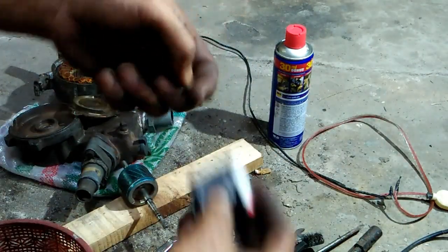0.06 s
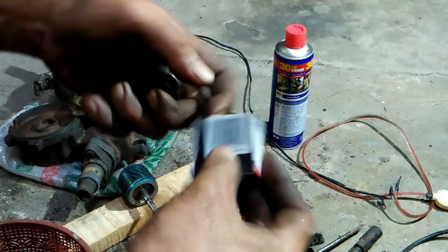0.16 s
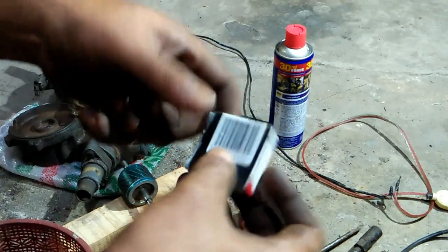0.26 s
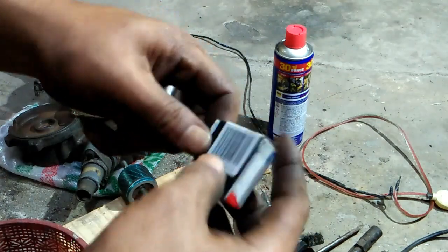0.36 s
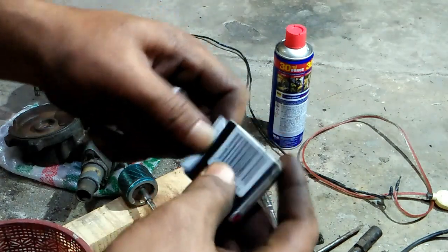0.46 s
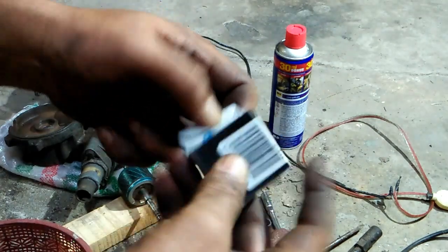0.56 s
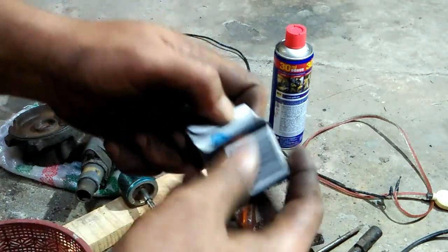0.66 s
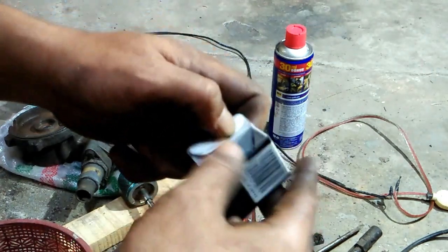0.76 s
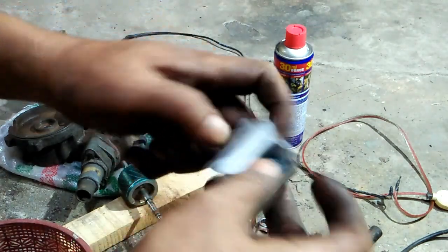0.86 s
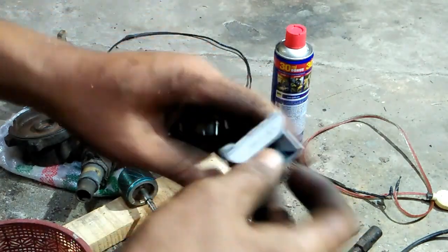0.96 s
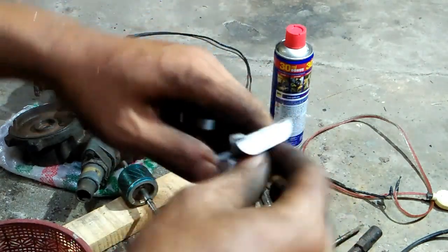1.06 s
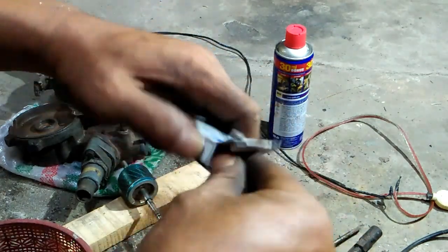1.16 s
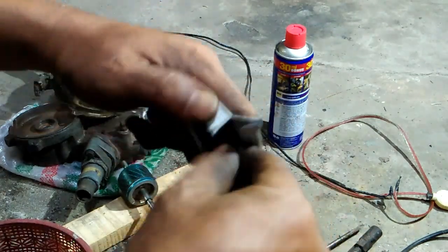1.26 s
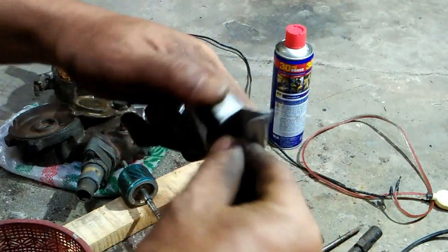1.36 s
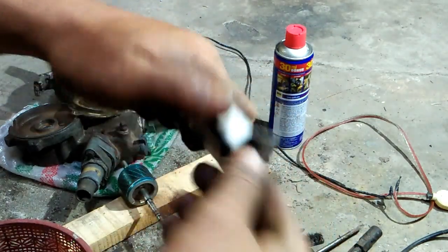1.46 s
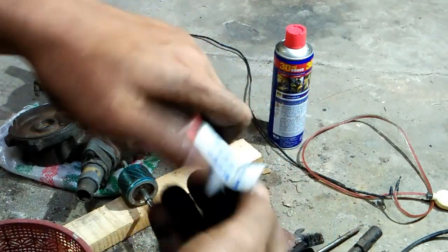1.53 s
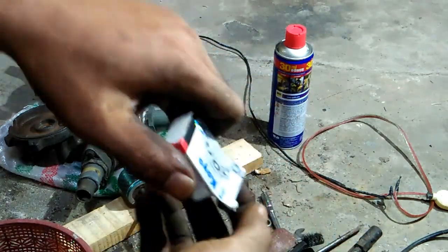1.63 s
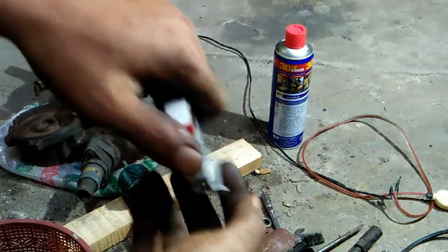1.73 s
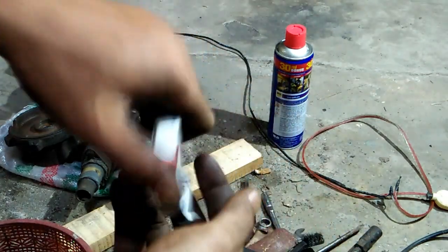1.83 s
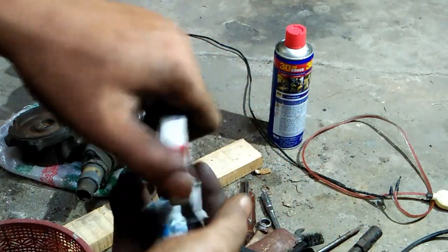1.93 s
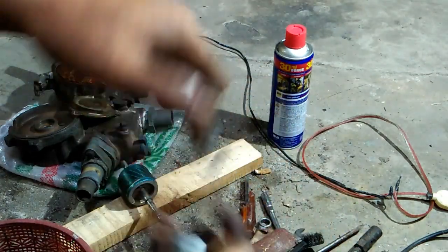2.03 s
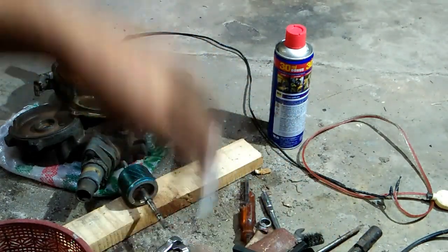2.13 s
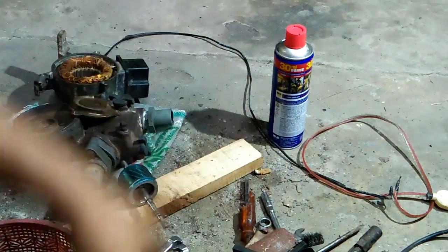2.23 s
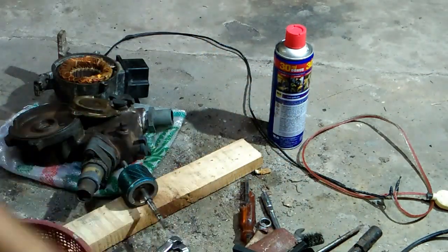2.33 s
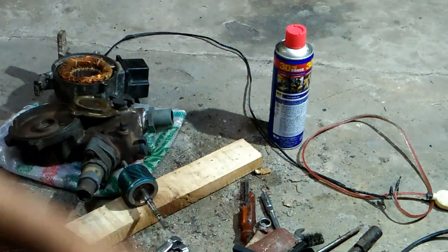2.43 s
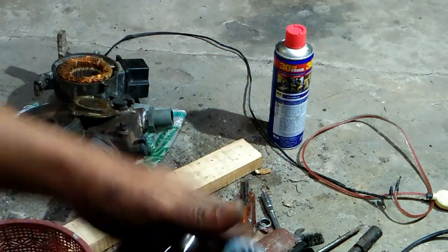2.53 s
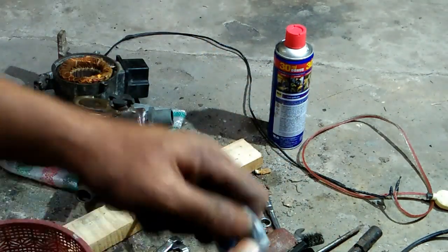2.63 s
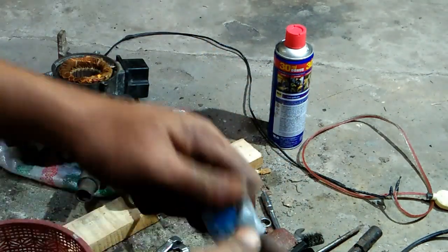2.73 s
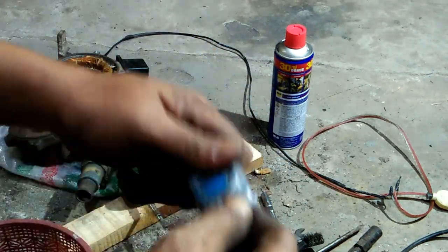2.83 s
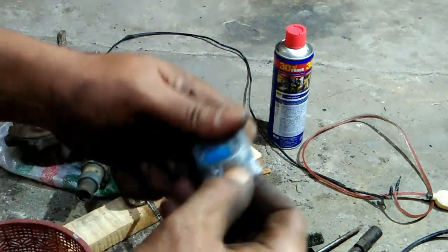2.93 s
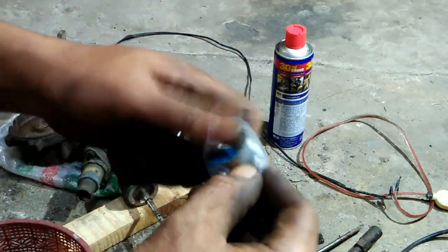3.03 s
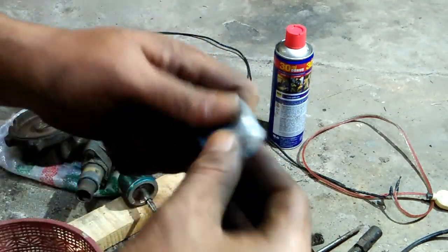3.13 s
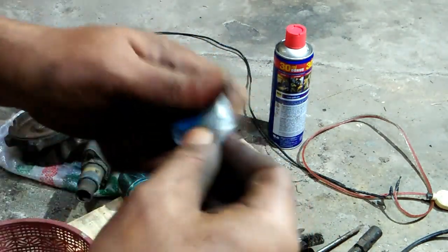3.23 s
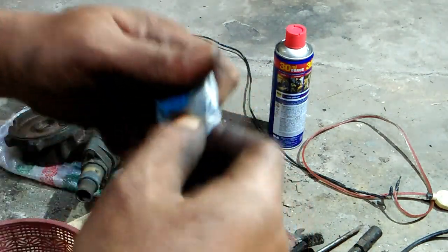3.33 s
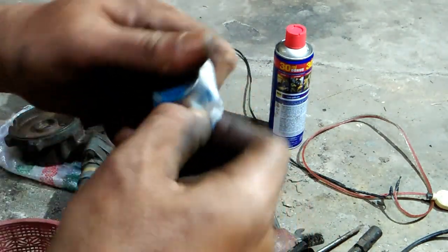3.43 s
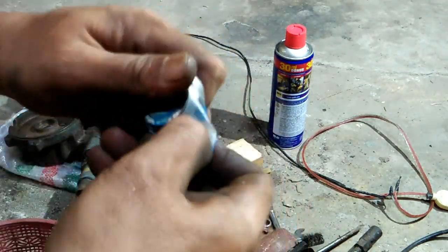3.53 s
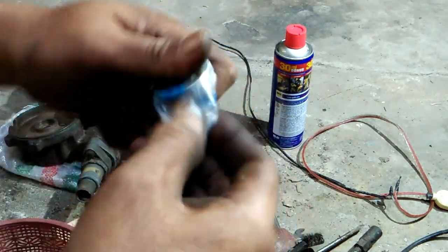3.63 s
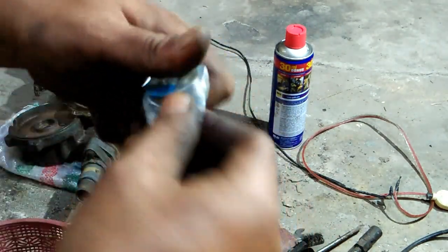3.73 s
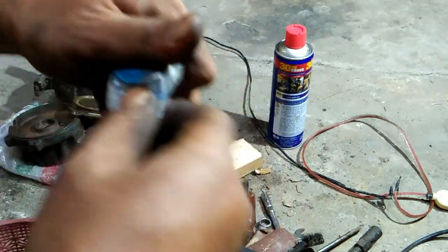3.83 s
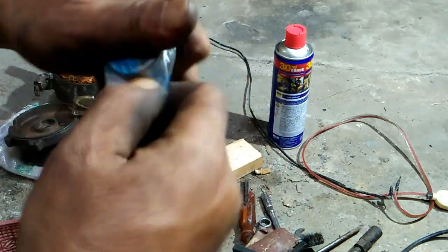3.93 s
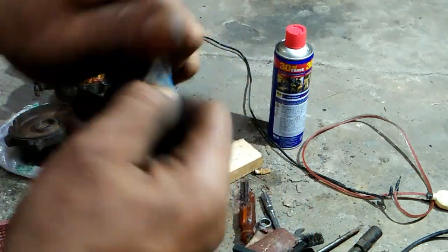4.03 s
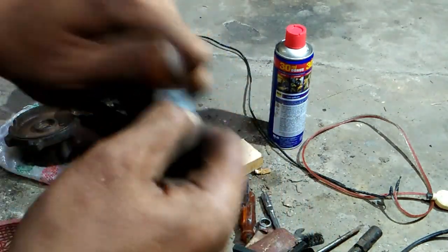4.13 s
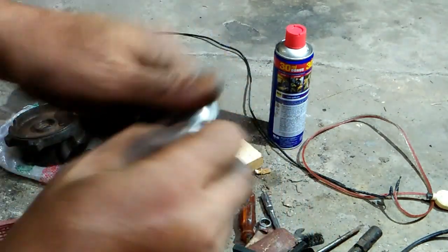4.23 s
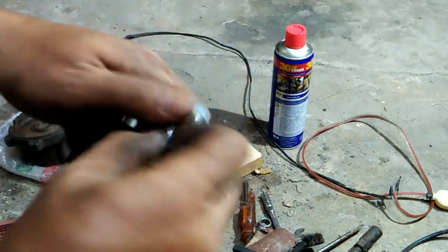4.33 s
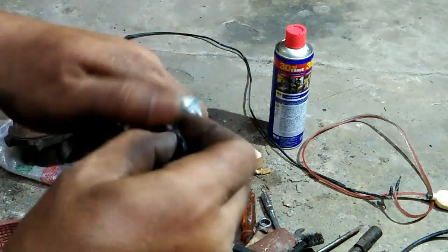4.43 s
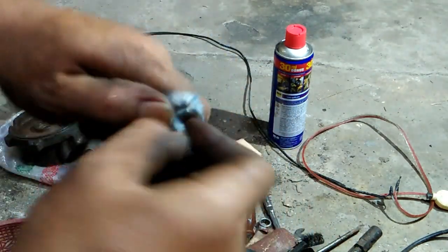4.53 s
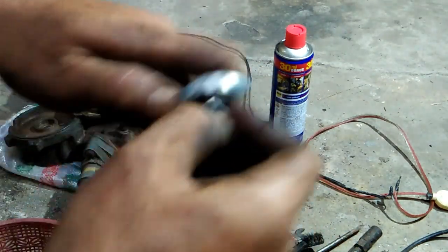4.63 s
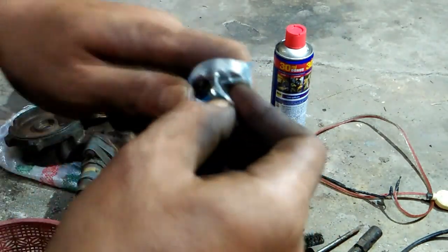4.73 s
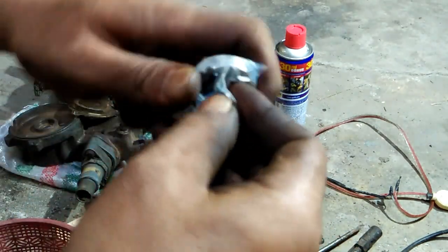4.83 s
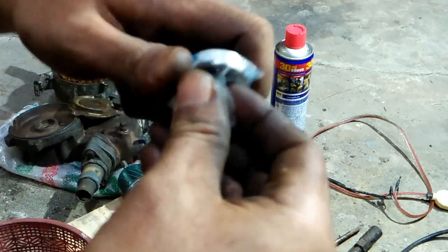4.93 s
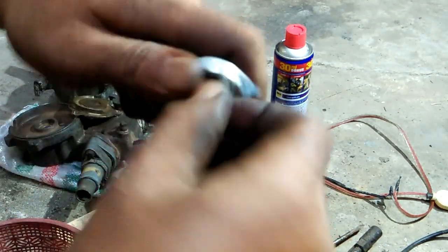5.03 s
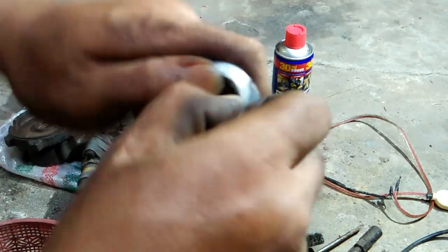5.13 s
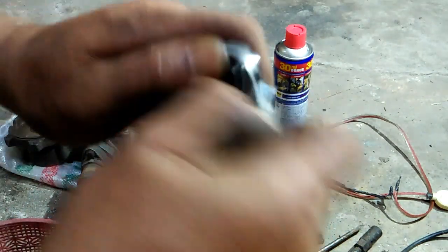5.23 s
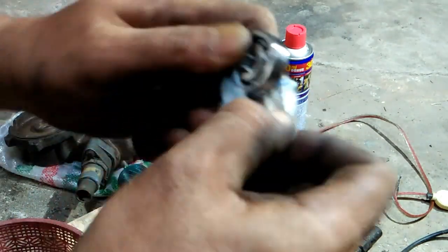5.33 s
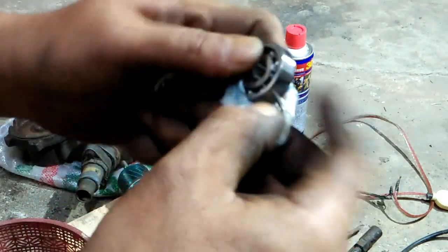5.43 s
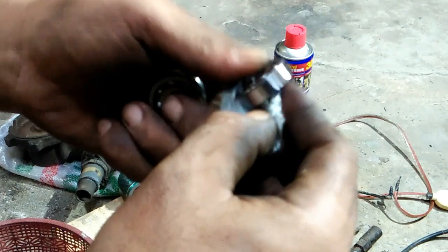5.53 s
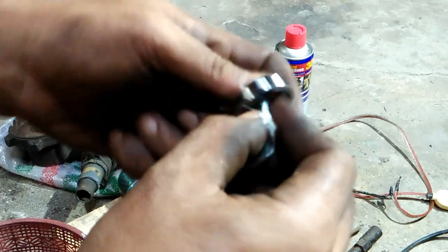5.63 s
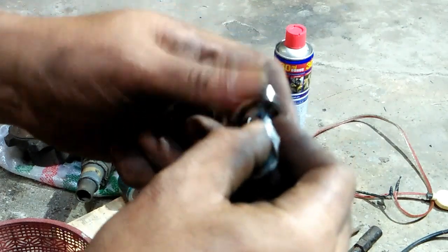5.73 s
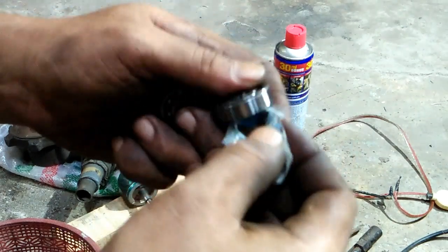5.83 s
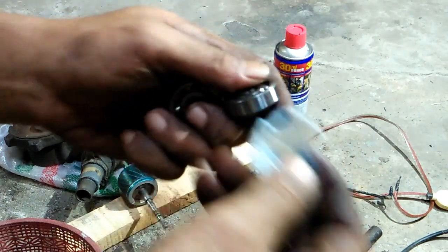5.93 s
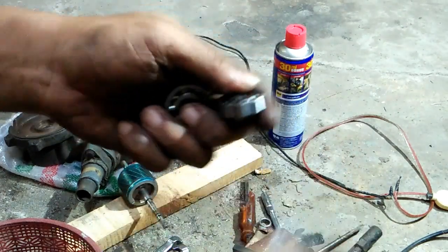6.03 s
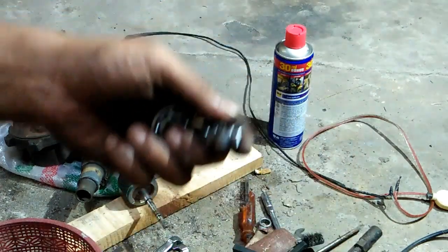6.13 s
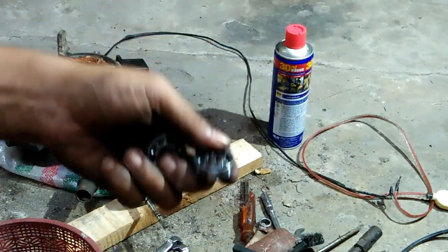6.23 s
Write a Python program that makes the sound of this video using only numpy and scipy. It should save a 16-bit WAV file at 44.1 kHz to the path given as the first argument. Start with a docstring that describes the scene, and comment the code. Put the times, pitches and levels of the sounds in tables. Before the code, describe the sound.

Dry, close handling sounds: soft hollow card taps and brief scrapes at first, a bright click or two, then a firm dull knock near the middle. From there thin stiff plastic crinkles almost continuously, with crisp high snaps and small avalanches of crackle over faint rubbing. Low soft hand bumps, still air and a faint hard-walled room sit behind.

```python
"""In a concrete work area, close by, two hands open a small carton, toss it aside and peel the thin
plastic sleeve off a ball bearing. Creases buckle in sharp snaps, each a filtered pulse with a ring, and in
avalanches of tiny random pulses; card and cupped fingers add a hollow resonance. Narrow noise gives the
sliding, short low pulses the knocks, shaped noise the air and soft bumps.
Convolution with a decaying noise tail adds the faint room and a late wall echo."""
import sys
import numpy as np
from scipy import signal
from scipy.fft import rfft, irfft
from scipy.io import wavfile
from scipy.ndimage import uniform_filter1d

SR = 44100
rng = np.random.default_rng(int(sys.argv[2]) if len(sys.argv) > 2 else 0)


def wav_out(sig):
    """Save sig, one row per channel (or a flat mono array), as 16-bit PCM at SR to the path in sys.argv[1]."""
    wavfile.write(sys.argv[1], SR, np.round(np.clip(np.atleast_2d(sig).T, -1, 1) * 32767).astype(np.int16))


N = 276507

# Still air. Each row: frequency in Hz, relative level in dB per Hz.
AIR_SPECTRUM = [(20, -6), (45, -6.5), (80, 5), (120, -6.5), (170, -4), (250, -13), (500, -10.5),
                (1100, -8.5), (1800, -19), (3000, -22.5), (6000, -28.5), (9400, -20), (14000, -19)]
AIR_DB = -70
# Low bumps of the hands. Each row: frequency in Hz, relative level in dB per Hz.
BUMP_SPECTRUM = [(15, -15), (45, 7), (80, -5), (115, -3), (170, -12.5), (260, -26.5), (500, -31)]
# Soft bumps of the hands. Each row: time of the peak in seconds, level in dB.
BUMPS = [(0.174, -57.5), (0.82, -66), (1.165, -60), (1.98, -65), (4.695, -66), (5.04, -71), (5.21, -60),
         (5.27, -58), (5.315, -57), (5.395, -61.5), (5.71, -61)]
# Reverberation time of the room. Each row: frequency in Hz, time to fall by 60 dB in seconds.
ROOM_T60 = [(300, 0.98), (1500, 0.4), (4000, 0.15), (9000, 0.45), (14000, 0.62)]
# Swishes and squeaks of sliding. Each row: start in seconds, length in seconds, first frequency in Hz,
# last frequency in Hz, width of each of two resonances in Hz, level in dB.
SLIDES = [(0, 0.4, 3060, 2170, 1000, -69.5), (1.154, 0.17, 523, 613, 348, -71),
          (1.677, 0.087, 1730, 1600, 446, -59), (1.935, 0.085, 1730, 1720, 395, -49),
          (2.249, 0.072, 800, 875, 365, -57.5), (2.961, 0.051, 3850, 4000, 800, -61),
          (3.012, 0.01, 3670, 3730, 1080, -40), (3.458, 0.112, 825, 760, 407, -61.5),
          (2.425, 0.13, 887, 820, 250, -65.5), (4.407, 0.046, 850, 875, 200, -63.5),
          (5.501, 0.034, 3350, 4070, 500, -50)]
# Dull knocks of carton and fingers. Each row: start in seconds, level in dB over 10 ms.
KNOCKS = [(0.6207, -48), (1.032, -54), (1.183, -59), (1.256, -58.5), (2.07, -61), (2.595, -31.5),
          (3.177, -51.5), (3.523, -56), (5.216, -49), (6.0613, -51.5)]
# Spectrum of a knock. Each row: frequency in Hz, relative level in dB per Hz.
THUD_SPECTRUM = [(50, -44), (130, -31.5), (220, -30.5), (320, -12), (450, -14.5), (560, -6.5), (700, 0),
                 (950, 1.5), (1400, -11), (4000, -44)]
# Three bands heard with each buckle: bright crack of the film, a midrange ring from about 2.4 to 6 kHz, hollow
# note of card and fingers. Each row of the three: frequency in Hz, relative level in dB per Hz.
FILM_SPECTRUM = [(100, -78), (1000, -77), (3500, -38.5), (6000, -15), (7500, -6.5), (8600, -1), (9400, 1),
                 (10300, -2), (11200, -6.5), (12600, -11.5), (14300, -20)]
MIDRANGE_SPECTRUM = [(100, -49), (700, -59), (1400, -26.5), (2400, -1.5), (2800, 0), (3350, 0.5), (3900, 1),
                     (4700, 2.5), (5500, 1), (6300, 1.5), (9000, -18.5)]
HOLLOW_SPECTRUM = [(60, -66.5), (200, -36), (450, -29), (750, -10), (1080, -2.5), (1230, 0), (1380, -0.5),
                   (1600, -1.5), (1870, 0.5), (2150, -0.5), (2500, -8.5), (4500, -24.5)]
# The hollow is retuned by the grip. Each row: time in seconds, resonance in Hz.
GRIP = [(0.0, 1210), (0.45, 1280), (0.8, 1750), (1.25, 1400), (1.7, 1870), (2.1, 1620), (2.28, 940),
        (2.42, 1740), (2.62, 1240), (2.75, 1750), (3.2, 1440), (4.15, 1610), (4.45, 1090), (5.12, 1890),
        (5.25, 1070), (5.38, 1860), (5.75, 1880), (6.05, 1020)]
# The fingers never rest. Each row: time in seconds, level in dB of the faint rustle of the film, level in dB
# of rubbing in the hollow, both before the shares below.
HANDLING = [(0.0, -57.5, -56), (0.57, -76.5, -66.5), (1.41, -57.5, -63), (1.9, -78, -90), (2.08, -83, -101),
            (2.41, -50, -49), (2.69, -66, -68), (3.02, -67, -65), (3.32, -65, -51), (3.65, -57, -64),
            (4.03, -48, -66), (4.19, -55.5, -74), (4.57, -52, -51.5), (4.8, -63.5, -108), (5.1, -53, -63),
            (5.31, -56, -69), (5.54, -62, -73), (6.27, -67, -69.5)]
# dB added for each part; film and midrange follow the rustle, the hollow follows the rubbing
FILM_SHARE_DB, MIDRANGE_SHARE_DB, HOLLOW_SHARE_DB = -6, -18.5, -10.5
# Squeezes and pulls that release many tiny buckles. Each row: time of the peak in seconds, rise in seconds,
# fall in seconds, film level in dB, midrange level in dB re film, hollow level in dB re film.
RUSTLES = [(0.02, 0.055, 0.032, -60.5, -7, 7), (0.611, 0.0052, 0.018, -44.5, -7, 1.5),
           (1.012, 0.0037, 0.03, -56, -10, -16), (1.185, 0.005, 0.062, -52.5, -7, 2),
           (1.4, 0.013, 0.023, -48.5, -24, -9), (1.545, 0.011, 0.005, -46.5, -11, -7.5),
           (1.595, 0.014, 0.029, -54, -5, 2), (1.693, 0.0085, 0.031, -57, -10, 4),
           (1.898, 0.0068, 0.02, -49.5, -9, -3), (1.982, 0.023, 0.027, -40.5, -2.5, 2),
           (2.055, 0.003, 0.021, -30, -5, -5.5), (2.258, 0.003, 0.39, -51, -5.5, -11),
           (2.59, 0.0013, 0.034, -51, 9, 17.5), (2.777, 0.02, 0.048, -40, -8, -2.5),
           (2.893, 0.01, 0.007, -28, -5.5, -14.5), (3.075, 0.0015, 0.017, -34, -12, -24.5),
           (3.115, 0.004, 0.043, -52, -6, -3.5), (3.19, 0.011, 0.078, -50, -3.5, 5),
           (3.295, 0.016, 0.11, -44, -6, -9.5), (3.409, 0.017, 0.0092, -33, -14, -26),
           (3.541, 0.024, 0.012, -60, -3, 10), (3.587, 0.022, 0.006, -43.5, -21, -26),
           (3.766, 0.025, 0.007, -49, -18, -21), (3.84, 0.0094, 0.021, -35.5, -5.5, -11),
           (3.933, 0.0062, 0.0099, -34.5, -12, -13.5), (4.192, 0.0053, 0.01, -55, -3.5, -8),
           (4.323, 0.0048, 0.025, -40, -9.5, -9), (4.502, 0.029, 0.027, -38, -11, -16),
           (4.611, 0.0039, 0.012, -45.5, -2, -31), (4.67, 0.008, 0.051, -40, -13, -21),
           (4.754, 0.071, 0.058, -49.5, -11, -20), (5.165, 0.005, 0.079, -49, -4.5, -4),
           (5.331, 0.0072, 0.015, -41, 0.5, -12), (5.388, 0.0053, 0.021, -27, -7, -7.5),
           (5.522, 0.012, 0.022, -40, -12.5, -14), (5.653, 0.014, 0.012, -42, -4, -6.5),
           (5.735, 0.031, 0.025, -45, -12, -10), (5.821, 0.012, 0.012, -35, -15, -17),
           (5.942, 0.014, 0.02, -37, -8.5, -10), (6.064, 0.017, 0.013, -48.5, -19, -11),
           (6.141, 0.011, 0.022, -50, -19, -22)]
# Single buckles, loud and faint. Each row: start in seconds, level in dB of the bright crack over 3 ms,
# midrange ring in dB re crack, hollow note in dB re crack, centre of the crack in Hz.
SNAPS = [(0.6208, -24.5, -5.5, -9.5, 7500), (0.8173, -53, 5, 9, 8100), (0.9867, -38.5, -9.5, -7.5, 10100),
         (1.2852, -46.5, -8, -1, 9900), (1.3674, -45.5, -19, -11, 9000), (1.5481, -26, -13, -8, 10000),
         (2.004, -31, -7, -16, 9500), (2.06, -28, -12, -13, 9800), (2.117, -33, -6.5, -16, 9300),
         (2.254, -37.5, -15, -28, 9400), (2.2905, -35.5, -3, -8, 9200), (2.3321, -35, -13, -21, 10300),
         (2.3979, -28, -9.5, -19.5, 9400), (2.4868, -35.5, -2, -7, 8900), (2.5849, -23.5, -23, -5, 9400),
         (2.5921, -21, -13, -8, 9800), (2.5949, -21.5, 0, 3, 8000), (2.7501, -31, -6, -9, 8700),
         (2.7563, -35, -7, -10, 9100), (2.7721, -28, -9, -7.5, 8850), (2.809, -32.5, -4, -10, 8860),
         (2.8569, -29, -10.5, -22, 9500), (2.869, -45, -19, -22, 8300), (2.8828, -28.5, -13, -10.5, 9200),
         (2.91, -38, -3, -12, 9500), (2.944, -46.5, -4.5, -14, 9300), (3.016, -28.5, -7, -26.5, 8600),
         (3.0725, -35, -4.5, -31, 9250), (3.1267, -36, -21, -25, 11200), (3.187, -33, -1.5, -10, 8700),
         (3.192, -27, -11.5, -36, 8600), (3.239, -41, -5, -3, 8100), (3.2893, -19, -8.5, -21.5, 9200),
         (3.3699, -32, -9.5, -10.5, 10200), (3.3862, -32, -22, -34, 8900), (3.4005, -36.5, -1, -8, 8600),
         (3.432, -27.5, -17.5, -29, 7860), (3.451, -33, -17, -30, 9450), (3.555, -45, -12, -20, 9700),
         (3.617, -45.5, -4.5, -7, 9600), (3.7727, -29, -14, -15.5, 11160), (3.818, -27, -21, -23, 9650),
         (3.835, -30, -1.5, -9, 8850), (3.8723, -38, -8.5, -16, 9400), (3.9392, -28, -4.5, -18.5, 9400),
         (3.9978, -30, -13, -26, 8200), (4.0597, -36, -10.5, -6.5, 9100), (4.0974, -39.5, -2.5, -11, 9200),
         (4.1123, -22, -11.5, -17.5, 9100), (4.1999, -31, -13.5, -26, 9700),
         (4.2065, -35.5, -28, -37, 9150), (4.483, -30.5, -20, -32, 9200), (4.5335, -33, -2.5, -11.5, 9200),
         (4.6305, -35.5, -30, -43, 9850), (4.6813, -22, -12.5, -23.5, 8050), (4.7183, -40, -11, -18, 9900),
         (4.7924, -27, -12.5, -27.5, 10500), (4.8858, -37.5, -49, -22.5, 11000),
         (4.9489, -33, -25.5, -27, 10100), (5.0394, -36.5, -20.5, -25, 9600),
         (5.0999, -32.5, -12, -16, 8300), (5.1279, -31, -12, -20, 9200), (5.1565, -31.5, -4, -9.5, 9900),
         (5.1601, -31.5, -6.5, -22, 9000), (5.2217, -38.5, -17, -23, 8350), (5.2316, -41, -4, -14, 7800),
         (5.2666, -38, -12, -23, 9700), (5.274, -36, -6, -4, 9900), (5.2866, -24.5, -14, -11.5, 8900),
         (5.3222, -37.5, -12, -5, 8800), (5.3733, -29.5, -2, -19, 9500), (5.377, -22.5, -9, -20, 8800),
         (5.382, -20, -2, -9, 8700), (5.402, -28, -12, -14, 9500), (5.4756, -36.5, -5.5, -11, 10100),
         (5.5082, -43, 2, -2, 8500), (5.6518, -28, -13.5, -19, 8900), (5.6673, -34.5, -10, -26, 9500),
         (5.7242, -33, -13.5, -23, 9000), (5.818, -34.5, -11.5, -17.5, 8500),
         (5.9438, -34.5, -28, -31, 8800), (6.0614, -45, -1, -2, 9250)]
# Fingers tap the card or cupped wrapping. Each row: start in seconds, level in dB of the hollow over 3 ms.
TAPS = [(0.01, -52), (0.1821, -48), (0.282, -41), (0.414, -56.5), (0.484, -55.5), (0.502, -63), (0.74, -63),
        (0.8522, -46.5), (1.032, -46), (1.137, -45.5), (1.1923, -46), (1.2557, -37.5), (1.4351, -46.5),
        (1.6926, -51), (2.0698, -29), (2.449, -46.5), (2.624, -38.5), (2.6544, -53.5), (2.707, -45.5),
        (3.1775, -36), (3.523, -42.5), (3.5439, -42), (3.717, -46.5), (4.144, -52.5), (4.751, -52),
        (5.188, -44.5), (5.216, -38.5), (5.332, -40.5), (5.895, -51), (5.9276, -40)]
TAP_CRACK_DB, TAP_MIDRANGE_DB, TAP_CRACK_HZ = -13, -19.5, 9000  # levels against the tap's hollow note
# Span in which the sleeve is worked: start in seconds, end in seconds.
FILM_HELD = (2.3, 5.95)
TICK_HZ, TICK_COLOUR_DB = 8700, 6.5  # centre of a stray tick's crack, greatest upward change of colour
# an avalanche's level after a snap of -30 dB, dB more per dB of snap, its hollow against the snap's
AVALANCHE_DB, AVALANCHE_SLOPE, AVALANCHE_HOLLOW_DB = -43.5, 0.7, -4
AVALANCHE_RISE_S, AVALANCHE_FALL_S, AVALANCHE_DELAY_S = 0.0016, 0.012, 0.0022
LOADING_DB, LOADING_RISE_S, LOADING_FALL_S = -3.5, 0.002, 0.002  # creak of loading, dB re avalanche
EDGE_HZ = 14450  # upper band limit


def amp(db):
    """Level: an amplitude ratio is ten to the power of dB over 20."""
    return 10 ** (np.asarray(db) / 20)


def read(points, hz):
    """Logarithmic frequency: a table of (Hz, value) is joined by lines on that axis."""
    f, value = np.transpose(points)
    return np.interp(np.log(hz + 1), np.log(f + 1), value)


def unit(x):
    """Normalization: the signal is scaled to rms 1."""
    return x / np.sqrt(np.mean(x ** 2) + 1e-30)


def add(mix, s, sound):
    """Superposition: a sound is summed into the mix at time s."""
    part = mix[max(round(s * SR), 0):][:len(sound)]
    part += sound[:len(part)]


def response(points, size=2048):
    """Transfer function: a spectrum table becomes gain by bin, with rms 1."""
    return unit(amp(read(points, np.fft.rfftfreq(size, 1 / SR))))


def causal(gain):
    """Minimum phase: the Hilbert transform of log gain gives the sharpest one-sided pulse."""
    two_sided = np.r_[gain, gain[-2:0:-1]]
    log_gain = np.log(np.maximum(two_sided, gain.max() * amp(-80)))
    return np.fft.ifft(np.exp(np.conj(signal.hilbert(log_gain)))).real


def through(x, pulse):
    """Linear filtering: convolution with an impulse response, cut to the input's length."""
    return signal.oaconvolve(x, pulse)[:len(x)]


def ripple(depth_db, order, size=1025):
    """Modal irregularity: no two folds share the same random hills and valleys over frequency."""
    hills = rng.standard_normal(size)
    for _ in range(2):
        hills = uniform_filter1d(hills, order, mode="wrap")
    return amp(depth_db * np.minimum(unit(hills), 1))  # the peaks are damped, the notches stay deep


def scatter(decay_s, size=1024):
    """Diffuse decay: a dying random patter of unit energy that favours no pitch."""
    fade = np.exp(-np.arange(size) / SR / decay_s)
    patter = rng.standard_normal(size) * np.sqrt(fade)
    whitened = irfft(np.exp(1j * np.angle(rfft(patter))), size)
    tail = whitened * np.sqrt(fade)
    return tail / np.linalg.norm(tail)


def struck(ring_db, ring_s):
    """Impulsive excitation: a single push followed by a dying patter."""
    push = amp(ring_db) * scatter(ring_s)
    push[0] += 1
    return push


def resonate(x, hz, width):
    """Resonance: a one-pole filter in a rotating frame has gain 1 at its peak and follows the curve hz."""
    turn = np.exp(2j * np.pi * np.cumsum(hz) / SR)
    r = np.exp(-np.pi * width / SR)
    return 2 * (turn * signal.lfilter([1 - r], [1, -r], x / turn)).real


def noise(points):
    """Stationary noise: white noise shaped to a spectrum, rms 1."""
    gain = amp(read(points, np.fft.rfftfreq(N, 1 / SR)))
    return unit(irfft(rfft(rng.standard_normal(N)) * gain, N))


def background(bump_s=0.019):
    """Ambient noise: quiet air, and low noise under Gaussian swells for the bumps of handling."""
    t = np.arange(N) / SR
    bumps = sum(amp(db) * np.exp(-((t - s) / bump_s) ** 2) for s, db in BUMPS)
    return amp(AIR_DB) * noise(AIR_SPECTRUM) + bumps * noise(BUMP_SPECTRUM)


def room(x, tail_db=-17, echo_db=-30, echo_s=0.047, echo_spread_s=0.0053,
         max_blend=amp(-3), bounce_db=-19, bounce_s=0.005):
    """Reverberation: a thin diffuse tail dies band by band, with a smeared echo from a far wall."""
    hz, t, z = signal.stft(rng.standard_normal(SR), SR, nperseg=256)
    decay = amp(-60 * t / read(ROOM_T60, hz)[:, None])
    tail = signal.istft(z * decay, SR, nperseg=256)[1]
    tail[:round(.004 * SR)] = 0  # sound needs a moment to reach the nearest surface
    tail *= amp(tail_db) / np.linalg.norm(tail)
    add(tail, bounce_s, amp(bounce_db) * scatter(0.00052))  # first bounce off the floor
    add(tail, echo_s, amp(echo_db) * scatter(echo_spread_s))
    # the walls hear each fold from all sides, so its sharp peaks and notches average out
    z = signal.stft(x, SR, nperseg=256)[2]
    smooth = np.sqrt(abs(uniform_filter1d(abs(z) ** 2, size=7, axis=0)))
    blend = np.clip(hz[:, None] / 5000, 0, 1) ** 2 * max_blend
    magnitude = (1 - blend) * abs(z) + blend * smooth
    spread = signal.istft(magnitude * np.exp(1j * np.angle(z)), SR, nperseg=256)[1]
    return through(spread[:N], tail)


def slides():
    """Sliding friction: noise in a narrow resonance that drifts during the stroke."""
    out = np.zeros(N)
    for s, length, first, last, width, db in SLIDES:
        hz = np.linspace(first, last, round(length * SR))
        rub = rng.standard_normal(len(hz))
        swish = resonate(resonate(rub, hz, width), hz, width)
        add(out, s, amp(db) * unit(swish * signal.windows.tukey(len(hz), .5)))
    return out


def knocks(ring_s=0.0071, ring_db=-3):
    """Damped impact: a soft blow on card gives one low push and a short ring."""
    out, span = np.zeros(N), .01 * SR
    for s, db in KNOCKS:
        thud = signal.fftconvolve(struck(ring_db, ring_s), causal(response(THUD_SPECTRUM)))
        add(out, s, amp(db) * np.sqrt(span) * thud / np.linalg.norm(thud))
    return out


def buckles():
    """Shared mechanism: taps join the snap rows, as snaps that are nearly all hollow note."""
    taps = [(s, db + TAP_CRACK_DB, TAP_MIDRANGE_DB - TAP_CRACK_DB, -TAP_CRACK_DB, TAP_CRACK_HZ)
            for s, db in TAPS]
    return SNAPS + taps


def avalanches():
    """Avalanche: a creak leads up to each buckle, crackle follows; both grow more slowly than it."""
    usual_db, rows = -30, []
    for s, db, midrange, hollow, _ in buckles():
        level = AVALANCHE_DB + AVALANCHE_SLOPE * (db - usual_db)
        colour = midrange, hollow + AVALANCHE_HOLLOW_DB
        rows += [(s, LOADING_RISE_S, LOADING_FALL_S, level + LOADING_DB, *colour),
                 (s + AVALANCHE_DELAY_S, AVALANCHE_RISE_S, AVALANCHE_FALL_S, level, *colour)]
    return rows


def crackle(points, per_s, spread_db, ripple_db, rub_db, count=12):
    """Shot noise: tiny buckles of uneven size on differently tuned folds, over the hiss of rubbing."""
    shape, out = response(points), np.zeros(N)
    for _ in range(count):
        sizes = amp(spread_db * np.minimum(rng.exponential(1, N), 4)) * rng.choice([-1, 1], N)
        pulses = sizes * (rng.random(N) < per_s / count / SR)
        out += through(pulses, causal(unit(shape * ripple(ripple_db, order=14))))
    rubbing = unit(through(rng.standard_normal(N), causal(shape)))
    return unit(out) + amp(rub_db) * rubbing


def levelled(x):
    """Automatic levelling: crackle is divided by its short-time rms, so the swells set its loudness."""
    return x / np.sqrt(uniform_filter1d(x ** 2, size=900) + 1e-9)


def rustles(grip_db=4, grip_width_hz=420):
    """Power addition: each squeeze swells and dies over steady handling, driving all three crackles."""
    t = np.arange(N) / SR
    times, film_db, rub_db = np.transpose(HANDLING)
    steady = [film_db + FILM_SHARE_DB, film_db + MIDRANGE_SHARE_DB, rub_db + HOLLOW_SHARE_DB]
    power = amp([np.interp(t, times, level) for level in steady]) ** 2
    for s, rise, fall, db, midrange, hollow in RUSTLES + avalanches():
        near = slice(*np.searchsorted(t, [s - 6 * rise, s + 6 * fall]))
        swell = np.exp(np.minimum((t[near] - s) / rise, (s - t[near]) / fall))
        power[:, near] += (amp([[db], [db + midrange], [db + hollow]]) * swell) ** 2
    film = crackle(FILM_SPECTRUM, per_s=1800, spread_db=5.5, ripple_db=4, rub_db=-7)
    middle = crackle(MIDRANGE_SPECTRUM, per_s=850, spread_db=8.5, ripple_db=10, rub_db=1)
    body = crackle(HOLLOW_SPECTRUM, per_s=420, spread_db=4.0, ripple_db=11.5, rub_db=-8.5)
    grip_hz = np.interp(t, *np.transpose(GRIP))
    body = body + amp(grip_db) * resonate(body, grip_hz, grip_width_hz)
    return (np.sqrt(power) * [levelled(film), levelled(middle), levelled(body)]).sum(0)


def ticks(over_db=5, spread_db=3, midrange_db=-21, hollow_db=-26, count=110):
    """Random occurrence: small stray buckles at chance moments while the film is in the hands."""
    times, film_db, _ = np.transpose(HANDLING)
    when, size, middle, hollow = rng.uniform(-0.82, 1, (count, 4)).T
    moments = np.interp(when, [-1, 1], FILM_HELD)
    levels = np.interp(moments, times, film_db) + over_db + spread_db * size
    midranges = midrange_db + TICK_COLOUR_DB * middle
    hollows = hollow_db + TICK_COLOUR_DB * hollow
    return list(zip(moments, levels, midranges, hollows, [TICK_HZ] * count))


def snaps(ripple_db=4, slip_db=-5, slip_s=0.00041, tilt_db=2.5, grip_db=6, grip_width_hz=260,
          bright_ring_db=-12, midrange_ring_db=-6, hollow_ring_db=-3,
          bright_ring_s=0.003, midrange_ring_s=0.0037, hollow_ring_s=0.0048):
    """Snap-through buckling: a crease flips with a crack and shudders; the lower parts ring on more."""
    out, span, hz = np.zeros(N), round(.003 * SR), np.fft.rfftfreq(2048, 1 / SR)
    for s, db, midrange, hollow, centre in buckles() + ticks():
        # small folds crack higher than the sheet's usual 9.3 kHz, large ones lower
        lean = (centre - 9300) * (np.clip(hz, 5500, 14000) - 9300) / 1e6
        grip_hz = np.interp(s, *np.transpose(GRIP))
        cavity = 1 / (1 + ((hz - grip_hz) / grip_width_hz) ** 2)
        crack_shape = response(FILM_SPECTRUM) * amp(tilt_db * lean)
        hollow_shape = response(HOLLOW_SPECTRUM) * amp(grip_db * cavity)
        parts = [(crack_shape, 0, bright_ring_db, bright_ring_s),
                 (response(MIDRANGE_SPECTRUM), midrange, midrange_ring_db, midrange_ring_s),
                 (hollow_shape, hollow, hollow_ring_db, hollow_ring_s)]
        push = struck(slip_db, slip_s)
        for shape, rel_db, ring_db, ring_s in parts:
            drive = push + amp(ring_db) * scatter(ring_s)
            sound = signal.fftconvolve(drive, causal(shape * ripple(ripple_db, order=22)))
            add(out, s, amp(db + rel_db) * sound / np.sqrt(np.mean(sound[:span] ** 2)))
    return out


def scene():
    """Direct and reflected sound: the hands' work close up, with the room behind it."""
    hands = snaps() + rustles() + slides() + knocks()
    return (hands + room(hands) + background())[None]


def record(dry):
    """Band limiting: a steep linear-phase low-pass removes the highest treble."""
    low_pass = signal.firwin(301, EDGE_HZ, window=("kaiser", 7), fs=SR)
    return signal.oaconvolve(dry, low_pass[None], "same")


dry = scene()
out = record(dry)
wav_out(out)
```